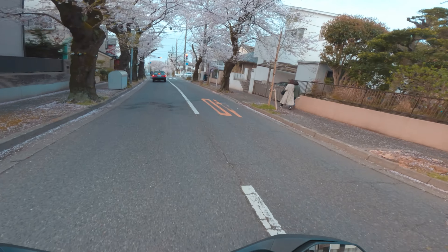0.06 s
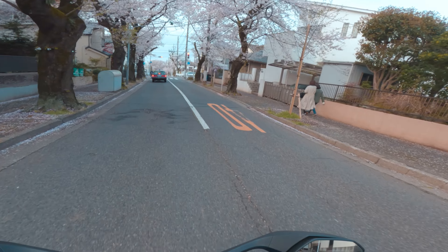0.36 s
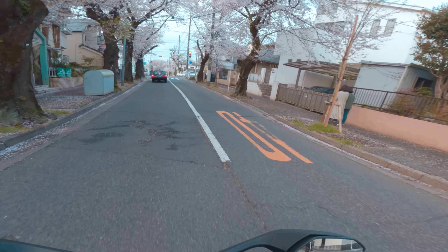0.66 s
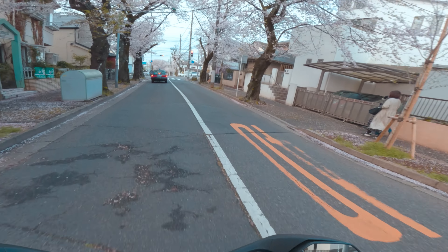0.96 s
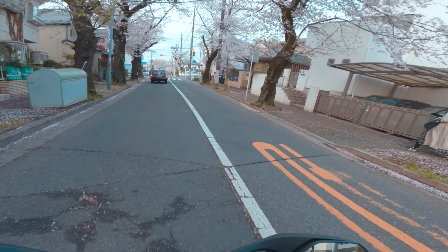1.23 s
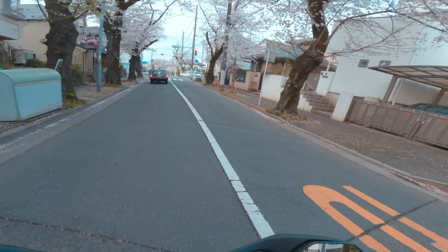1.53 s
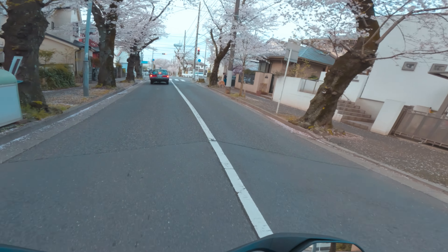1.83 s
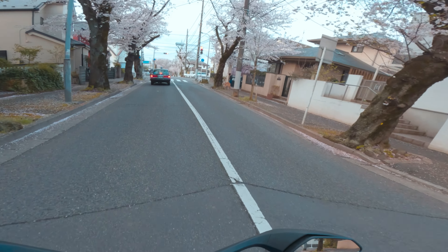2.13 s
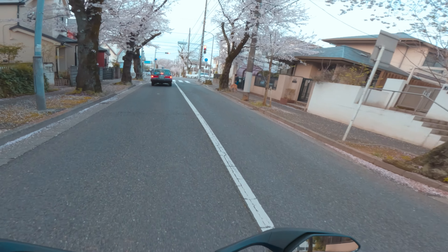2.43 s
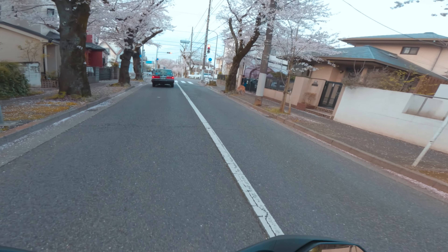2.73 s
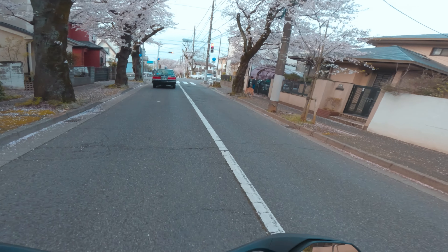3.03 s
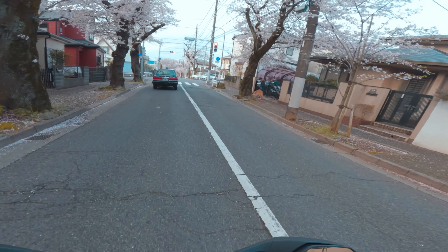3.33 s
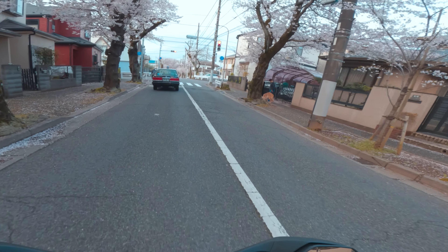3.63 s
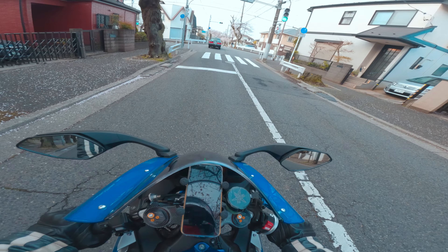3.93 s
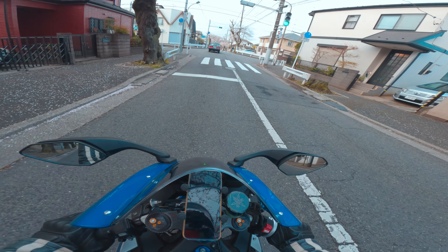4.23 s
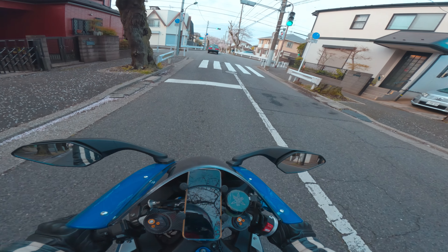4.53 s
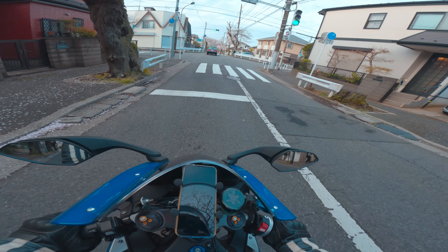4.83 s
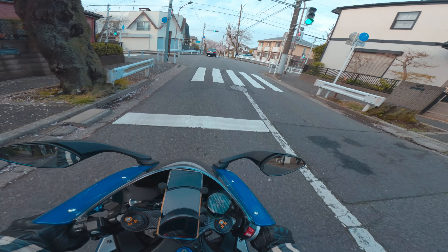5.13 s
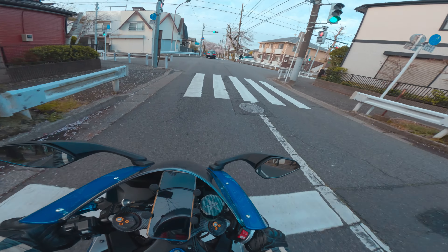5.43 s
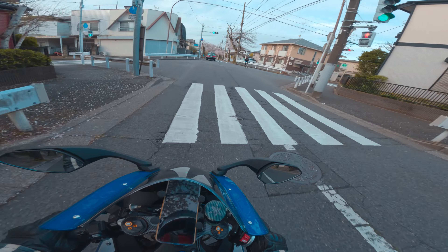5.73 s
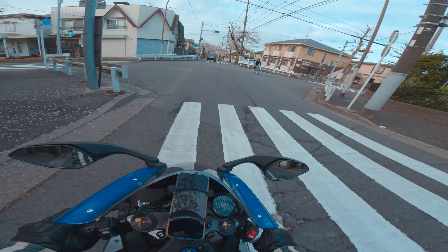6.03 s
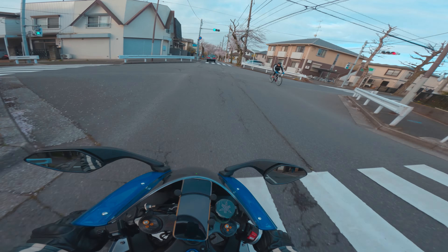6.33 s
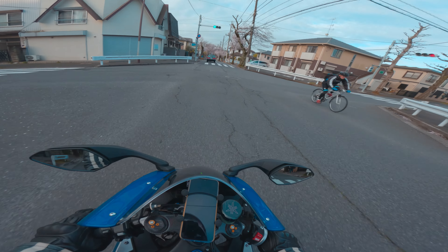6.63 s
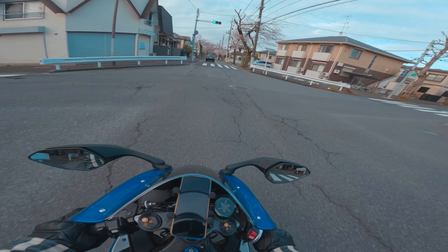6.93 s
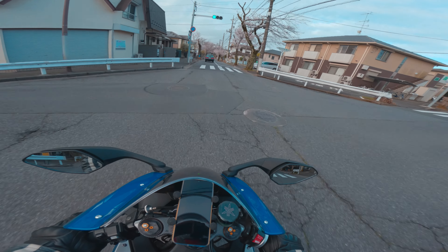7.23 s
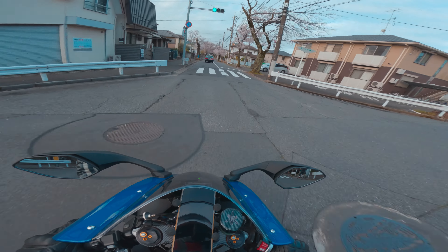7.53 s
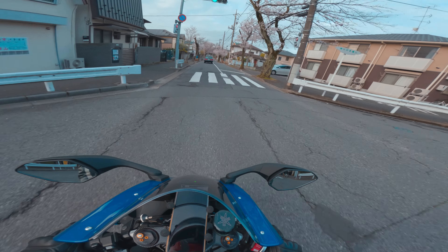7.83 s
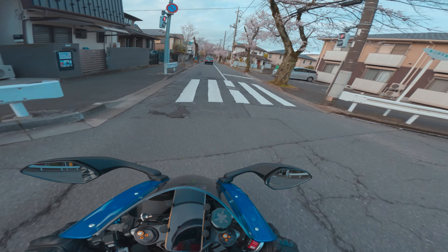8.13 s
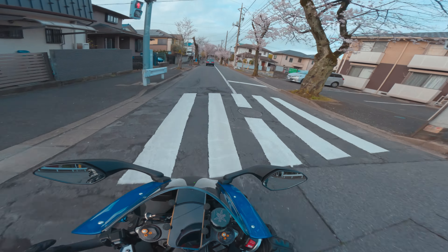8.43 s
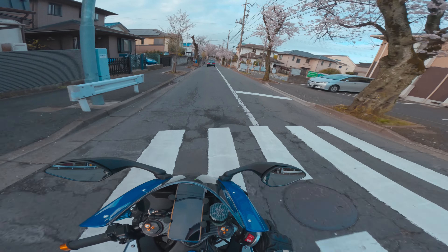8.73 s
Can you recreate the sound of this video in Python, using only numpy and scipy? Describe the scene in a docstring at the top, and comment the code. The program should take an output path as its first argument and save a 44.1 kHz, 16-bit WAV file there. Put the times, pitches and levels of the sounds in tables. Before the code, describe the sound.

Heard from the seat, a sport motorcycle coasts down to idle, briefly fades to silence, then accelerates with a rough, throaty rumble.

```python
"""On the road, microphone at the rider's seat of a crossplane four-cylinder sport motorcycle. The bike
cruises, coasts down to idle with its gears whining and fades out, then fades in again and pulls away on a
slipping clutch. Uneven firings boom in the silencer close by, over wind, tyres, mechanical hiss and the
odd rattle from a bump. Revs and load drive the engine's sound, and the exhaust overloads the microphone
whenever the throttle is open."""
import sys
import numpy as np
from scipy import signal
from scipy.fft import rfft, irfft, next_fast_len
from scipy.io import wavfile
from scipy.ndimage import map_coordinates

SR = 44100
rng = np.random.default_rng(int(sys.argv[2]) if len(sys.argv) > 2 else 0)


def output_pcm(signal):
    """Save a mono or channel-first signal as 16-bit PCM at the path in sys.argv[1].

    Samples are clipped to [-1, 1] before scaling.
    """
    pcm = np.clip(np.atleast_2d(signal).T, -1, 1) * 32767
    wavfile.write(sys.argv[1], SR, np.round(pcm).astype(np.int16))


N = 387198

# bumps in the road: (time [s], tick strength [dB], ring [Hz], swell of the clatter [dB])
BUMPS = [(0.358, -37, 4530, -1), (0.586, -34, 7800, 0), (.625, -33, 7300, -1.5), (1.085, -22, 4800, -2),
         (1.655, -39, 9200, -0.5), (1.698, -52, 4900, 1.5), (2.499, -29, 4560, 0), (7.52, -37, 3000, 5),
         (8.361, -36.5, 7500, 2.5), (8.629, -32, 7350, 2), (8.716, -35, 6600, 0.5)]

CRUISE_RPM = 2300  # engine levels are set for these revs and full load
GAP_S, GAP_HALF_S, FADE_S = 3.884, .008, 1  # the silence between the fades: middle, half-width; each fade
BITE_S, BITE_RISE_S = 5.02, 0.24  # the clutch bites and the drivetrain takes the strain


def amp(db):
    return 10 ** (np.asarray(db) / 20)


def unit(x):
    return x / np.sqrt(np.mean(x ** 2) + 1e-20)


def along(points, hz):
    """Level at hz between (Hz, dB) points, on a log axis."""
    freqs, levels = np.transpose(points)
    return np.interp(np.log(hz + 1), np.log(freqs + 1), levels)


def curve(points):
    """One value per sample between (time, value) points."""
    return np.interp(np.arange(N) / SR, *np.transpose(points))


def ramp(start, length):
    """Rises from 0 to 1 over length seconds."""
    return np.clip((np.arange(N) / SR - start) / length, 0, 1)


def wobble(rate):
    """A smooth random curve, rate knots a second."""
    return map_coordinates(rng.standard_normal(N // 50), [np.arange(N) * rate / SR], mode="mirror")


def filtered(x, response):
    """x through a complex frequency response."""
    size = 2 * next_fast_len(N // 2 + SR // 2)
    return irfft(rfft(x, size) * response(np.fft.rfftfreq(size, 1 / SR)), size)[:N]


def noise(spectrum):
    """Coloured noise of rms 1."""
    return unit(filtered(rng.standard_normal(N), lambda hz: amp(along(spectrum, hz))))


def pipe(x, spectrum):
    """Minimum-phase colour, rms 1: each pulse rings after it arrives."""
    def response(hz):
        cepstrum = irfft(np.log(amp(along(spectrum, hz))))
        half = len(cepstrum) // 2
        cepstrum[1:half] *= 2
        cepstrum[half + 1:] = 0
        return np.exp(rfft(cepstrum))
    return unit(filtered(x, response))


def impulses(at, size):
    """Pulses at fractional sample positions."""
    i = np.minimum(at.astype(int), N - 1)
    return (np.bincount(i, size * (1 - at + i), N + 1) + np.bincount(i + 1, size * (at - i), N + 1))[:N]


def tails(pulses, decay_s):
    """An envelope that dies away after each pulse, rms 1."""
    return unit(np.abs(signal.lfilter([1], [1, -np.exp(-1 / (decay_s * SR))], pulses)))


def firings(cycle, lean):
    """Each combustion gives a pulse, a steep front and a crack; lean cylinders burn unevenly."""
    # the uneven firing order: (place in the two-turn cycle [0-1], strength [dB], outlet crack [dB])
    firing_order = [(0, 0, -1), (3 / 8, 0, -6), (5 / 8, -0.65, -12), (6 / 8, -6, 0.71)]
    # misfires, each a brief hole in the exhaust note: (time [s], loss [dB])
    misfires = [(0.076, 24), (0.284, 10), (2.179, 9.5), (2.535, 15), (2.711, 11), (2.768, 6), (2.945, 5),
                (3.06, 4.5), (3.143, 5), (7.277, 4), (7.36, 16), (7.538, 18.5), (7.629, 18), (7.689, 12),
                (7.786, 22.5), (7.887, 13), (8.047, 14), (8.104, 15.5), (8.204, 22), (8.295, 16.5),
                (8.374, 15.5), (8.473, 16), (8.603, 5.5)]
    hole_half_s, header_s = 0.0082, 0.00197  # half-width of a hole; the fronts' trip through the headers
    front_share = .6  # how far fronts and cracks follow the burn
    pulses, fronts, cracks = np.zeros((3, N))
    count = np.arange(int(cycle[-1]) + 1)
    for share, db, crack_db in firing_order:
        at = np.interp(count + share, cycle, np.arange(N))
        leanness = lean[at.astype(int)]
        scatter_db = (13.5 * leanness - 2.07) * (.5 - np.abs(rng.standard_normal(len(at))))
        skip_db = 3 * leanness * (.5 - count % 2)  # every second cycle burns weakly
        hole_db = sum(loss * np.exp(-((at / SR - s) / hole_half_s) ** 2) for s, loss in misfires)
        burn_db = scatter_db + skip_db - hole_db
        late = np.minimum(at + header_s * SR, N - 1)
        pulses += impulses(at, amp(db + burn_db))
        fronts += impulses(late, amp(db + front_share * burn_db))
        cracks += impulses(late, amp(crack_db + front_share * burn_db))
    return pulses, fronts, cracks


def exhaust(pulses, fronts, cracks, cycle, revs, load, overrun):
    """Pulses boom in the silencer; load and revs add bark and rasp, a shut throttle leaves a drone."""
    # the silencer's boom: (frequency [Hz], gain [dB])
    boom_colour = [(8, -53.5), (30, -1.5), (55, -7.5), (90, 1.5), (125, 3), (165, 7.5), (205, 3),
                   (235, -5.5), (265, -12.5), (450, -35.5), (1000, -92.5)]
    # the bark above it: (frequency [Hz], gain [dB])
    bark_colour = [(150, -27.5), (260, -2), (335, 1.5), (420, 2), (490, 2.5), (550, -2), (630, 0.5),
                   (760, -24.5), (1000, -40.5), (1600, -43.5), (4000, -50.5), (12000, -72.5)]
    # the outlet pipe, rung by each firing's crack, sharpest twice a cycle: (frequency [Hz], gain [dB])
    throat_colour = [(250, -29.5), (400, 9.5), (490, 12), (560, 10), (630, 16.5), (780, -1.5), (950, -7),
                     (1300, -18), (3000, -33), (12000, -58)]
    # hot gas rasping at the outlet: (frequency [Hz], density [dB per Hz])
    rasp_colour = [(150, -46), (330, 4), (650, 3), (800, -6.5), (1200, -13.5), (2500, -26.5), (8000, -41),
                   (15000, -43)]
    shut = 1 - load
    # each layer in dB: level, loss with the throttle shut, gain per doubling of the revs
    boom = amp(-6 - 13 * shut - 2.5 * revs - 2 * overrun) * pipe(pulses, boom_colour)
    bark = amp(-25.5 - 23 * shut + 16.5 * revs) * pipe(fronts, bark_colour)
    throat = amp(-32.5 - 8 * shut + 9.5 * revs) * pipe(cracks, throat_colour)
    gas_puffs = tails(cracks, decay_s=.0028)
    rasp = amp(-35.5 - 6 * shut + 5.5 * revs) * noise(rasp_colour) * gas_puffs
    drone = overrun * amp(-15 + 3.5 * wobble(8.8)) * np.sin(2 * np.pi * 3 * cycle)
    return boom + bark + throat + rasp + drone


def mechanics(pulses, hiss_db):
    """Hiss puffs with each firing, and valve and chain clatter rings the engine casing."""
    # mechanical hiss: (frequency [Hz], density [dB per Hz])
    hiss_colour = [(400, -17.5), (900, -5.5), (1140, -12), (1330, -9.5), (1540, -13), (1720, -7.5),
                   (2260, -16.5), (2930, -13.5), (3510, -18), (4900, -17.5), (7180, -27), (10800, -31.5),
                   (13000, -39.5), (15700, -72.5)]
    # the casing's resonances: (frequency [Hz], width [Hz], gain [dB])
    casing_modes = [(1328, 68, -0.5), (1666, 330, -6.5), (2430, 87, -3), (2930, 230, -5), (3850, 650, -9),
                    (4500, 360, -13)]

    def casing(hz):
        return sum((-1) ** k * amp(db) * 1j * hz * width / (centre ** 2 - hz ** 2 + 1j * hz * width)
                   for k, (centre, width, db) in enumerate(casing_modes))
    puffs = tails(pulses, decay_s=0.011)
    hiss = noise(hiss_colour) * (1 + 0.034 * puffs)
    flicker = amp(0.89 * wobble(14) + 0.62 * wobble(500))
    knocks = rng.standard_normal(N) * amp(2.1 * wobble(350)) * (1 + 0.11 * puffs)
    clatter = amp(-6.5) * unit(filtered(knocks, casing))
    return amp(hiss_db) * (unit(hiss * flicker) + clatter)


def valves(cycle, hiss_db):
    """Valves tick under the hiss as they seat, in step with the crank."""
    # a valve tick: (frequency [Hz], density [dB per Hz])
    tick_colour = [(1200, -21.5), (3000, -5), (5000, 2), (7200, -12.5), (11000, -15), (15700, -44)]
    per_cycle, scatter_db = 8, 1.5
    at = np.interp(np.arange(int(cycle[-1] * per_cycle)) / per_cycle, cycle, np.arange(N))
    seatings = impulses(at, amp(scatter_db * rng.standard_normal(len(at))))
    return amp(hiss_db - 13.5) * noise(tick_colour) * tails(seatings, decay_s=.003)


def wind_and_tyres():
    """Air buffets the rider in gusts and the tyres roar."""
    # the roar at the seat: (time [s], level [dB])
    roar_level = [(0, -18.5), (1, -18), (1.2, -18.5), (1.9, -20.5), (2.3, -21.5), (3.8, -20.5), (5.4, -20),
                  (5.9, -23), (7.2, -19.5), (8.78, -18)]
    # its spectrum: (frequency [Hz], density [dB per Hz])
    roar_colour = [(15, -30), (30, -2.5), (60, 0), (120, -1), (220, 0), (320, -15), (600, -25.5),
                   (1000, -36), (2000, -64)]
    gust_db = 1.8 * wobble(7.6)
    return amp(curve(roar_level) + gust_db) * noise(roar_colour)


def rattles():
    """Bumps shake short bright ticks out of the fittings."""
    out, t = np.zeros(N + SR), np.arange(SR // 10) / SR
    ring_s = 0.07  # time to fall 60 dB
    for s, db, hz, _ in BUMPS:
        ring = signal.lfilter(*signal.iirpeak(hz, Q=3.5, fs=SR), rng.standard_normal(len(t)))
        out[round(s * SR):][:len(t)] += amp(db - 12 - 60 * t / ring_s) * unit(ring)
    return out[:N]


def jolts():
    """Bumps shake the chain and fairing, so the clatter briefly swells or dips (dB)."""
    t, half_width_s = np.arange(N) / SR, .06
    return sum(swell_db * np.exp(-((t - s) / half_width_s) ** 2) for s, _, _, swell_db in BUMPS)


def gears(cycle, wheel_pitch, load, overrun):
    """Meshing teeth sing, wavering with the backlash: under strain, on the overrun, with the wheel."""
    def whine(meshes, waver):
        phase = 2 * np.pi * meshes + waver * wobble(45) + .35 * wobble(220)
        return np.sin(phase) * amp(2 * wobble(40))
    drive_teeth, overrun_teeth = 37, 55  # meshes per engine cycle
    shut_s, backlash_s = 1.05, 0.18  # the throttle shuts; time to take up the backlash
    sag_db_per_s, pitch_unit_hz = 20, 70.1
    t = np.arange(N) / SR
    engaged = ramp(BITE_S + BITE_RISE_S, BITE_RISE_S)
    driving = engaged * amp(-26 - 69 * (1 - load)) * whine(drive_teeth * cycle, waver=2.6)
    sag_db = sag_db_per_s * np.maximum(t - shut_s, 0)
    braking = overrun * ramp(shut_s, backlash_s) * amp(-35 - sag_db)
    braking *= whine(overrun_teeth * cycle, waver=1.2)
    # gears tied to the rear wheel, heard while coasting
    meshes = np.cumsum(pitch_unit_hz * wheel_pitch) / SR
    wheel = whine(meshes, waver=5.9)
    wheel += amp(-5) * whine(1.17 * meshes, waver=2.1)
    wheel += amp(-6.5) * whine(.76 * meshes, waver=1.7)
    coasting = ramp(shut_s, 0.084) * (t < GAP_S)
    return driving + braking + coasting * amp(-47.5) * wheel


def clutch():
    """The plates ring as they slip while the bike gets going, until they lock."""
    # their narrow ring: (frequency [Hz], density [dB per Hz])
    ring_colour = [(400, -56), (690, -19), (775, 1.5), (850, -12.5), (1150, -12), (1400, -33), (4000, -82)]
    slipping = ramp(GAP_S, GAP_HALF_S) - ramp(start=6.7, length=0.45)
    return slipping * amp(-42.5 + 1.7 * wobble(14)) * noise(ring_colour)


def scene():
    """At the seat: revs time the firings and lift the hiss, load sets their strength and evenness."""
    # the crank while cruising, coasting and idling with the clutch pulled: (time [s], speed [rpm])
    rpm_slowing = [(0.0, 2255), (.22, 2265), (.35, 2375), (.45, 2225), (0.55, 2256), (1.05, 2269),
                   (1.9, 1934), (2.08, 1152), (2.3, 1356), (3, 1365), (3.88, 1342)]
    # the crank as the clutch drags it down and the bike then picks up: (time [s], speed [rpm])
    rpm_pulling = [(3.89, 3098), (4.25, 2426), (4.5, 2152), (4.8, 2140), (5.18, 1815), (5.5, 2086),
                   (5.85, 2412), (6.3, 2720), (6.7, 2990), (7.2, 3165), (7.4, 3039), (7.52, 3030),
                   (7.63, 3095), (7.75, 3048), (8.17, 3045), (8.28, 3110), (8.42, 2965), (8.6, 3095),
                   (8.78, 3000)]
    # how full the cylinders are, 0 with the throttle shut, about half at idle: (time [s], load [0-1])
    cylinder_load = [(0, 0.53), (.3, 0.78), (1.0, 0.81), (1.04, 0.02), (1.98, 0.1), (2.07, 0.4),
                     (3.87, 0.49), (3.9, 0.93), (5.2, 0.82), (7.22, 0.87), (7.33, 0.7), (7.9, 0.63),
                     (8.15, 0.81), (8.78, 0.77)]
    # the wheel whine's pitch while coasting, also a trim on the hiss level: (time [s], pitch [70.1 Hz])
    whine_pitch = [(1, 30.4), (2.05, 24.5), (2.8, 24.8), (3.88, 22.4), (5.2, 27.4), (7.2, 17.3)]
    rpm, load, wheel_pitch = curve(rpm_slowing + rpm_pulling), curve(cylinder_load), curve(whine_pitch)
    revs = np.log2(rpm / CRUISE_RPM)  # doublings above cruising
    # two crank turns a cycle; about half a cycle is skipped in the silence
    cycle = np.cumsum(rpm / 120) / SR - .059 + .53 * ramp(GAP_S, GAP_HALF_S)
    overrun = np.maximum(1 - load / .21, 0)  # nears 1 as the throttle shuts
    strain = ramp(BITE_S, BITE_RISE_S) - ramp(start=6.91, length=0.37)
    # under strain the chain hisses, swelling once a crank turn
    thrash_db = 4.5 + 1.2 * np.cos(2 * np.pi * 2 * (cycle - 0.41))
    trim_db = 4.5 * np.log2(wheel_pitch / 25)
    hiss_db = -40 + 5.5 * revs + trim_db + thrash_db * strain + jolts()
    pulses, fronts, cracks = firings(cycle, lean=(1 - load) * (rpm / CRUISE_RPM) ** 2)
    engine = exhaust(pulses, fronts, cracks, cycle, revs, load, overrun)
    engine += mechanics(pulses, hiss_db) + valves(cycle, hiss_db)
    drivetrain = gears(cycle, wheel_pitch, load, overrun) + clutch()
    return (engine + drivetrain + wind_and_tyres() + rattles())[None]


def record(dry):
    """The overloaded microphone flattens the peaks; the sound fades out and straight back in."""
    ceiling, hardness, top_hz = .715, 10, 15720
    clipped = dry[0] / (1 + np.abs(dry[0] / ceiling) ** hardness) ** (1 / hardness)
    fade = np.clip((np.abs(np.arange(N) / SR - GAP_S) - GAP_HALF_S) / FADE_S, 0, 1)
    return filtered(clipped * fade, lambda hz: (hz > 2) & (hz < top_hz))[None]


dry = scene()
out = record(dry)
output_pcm(out)
```